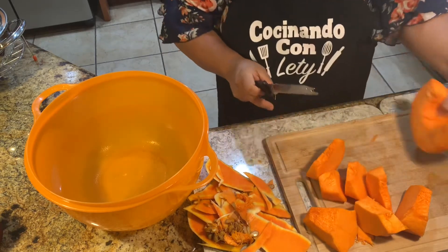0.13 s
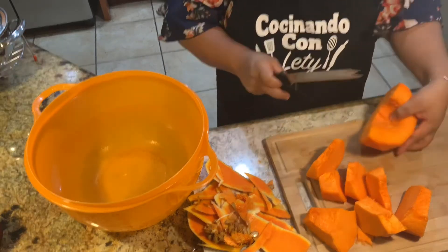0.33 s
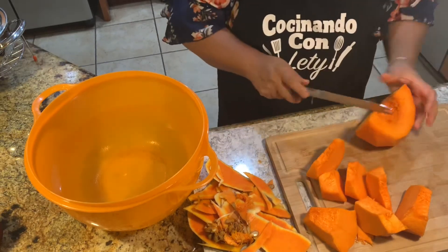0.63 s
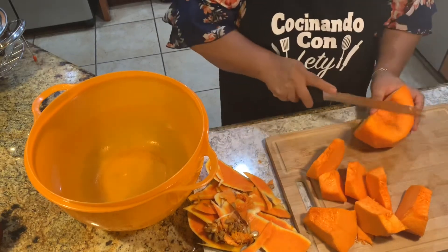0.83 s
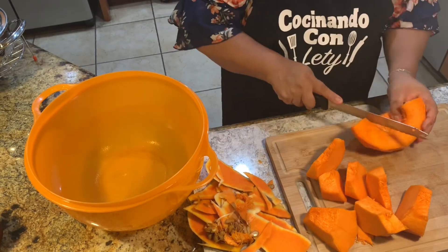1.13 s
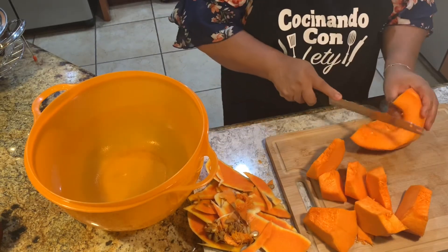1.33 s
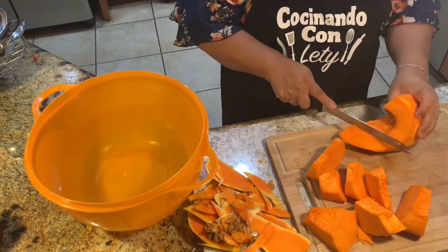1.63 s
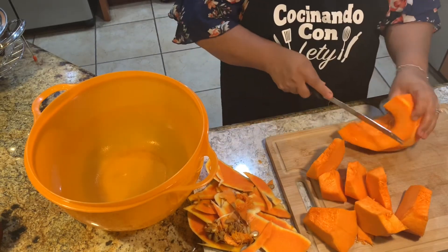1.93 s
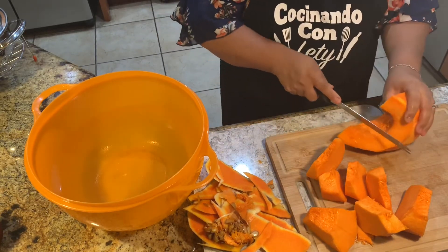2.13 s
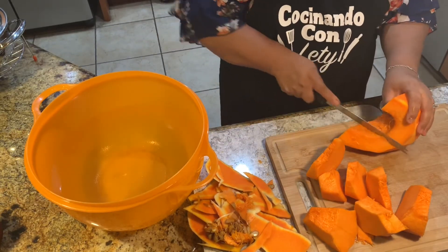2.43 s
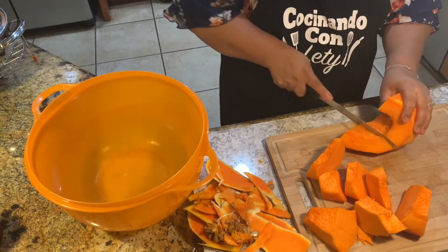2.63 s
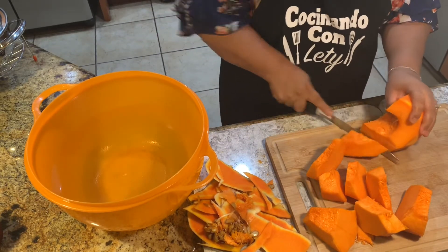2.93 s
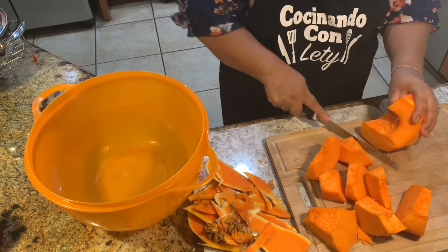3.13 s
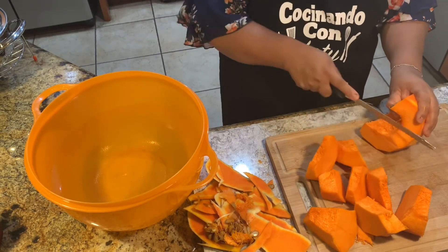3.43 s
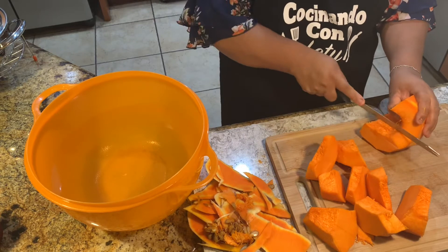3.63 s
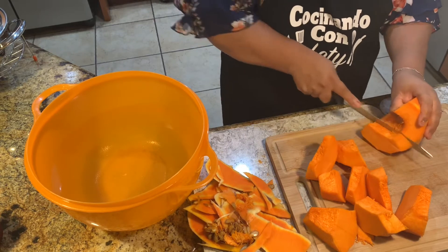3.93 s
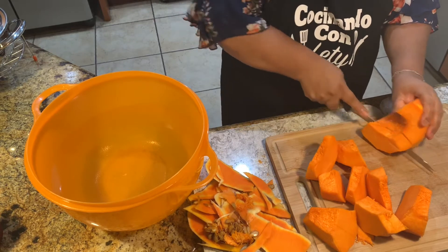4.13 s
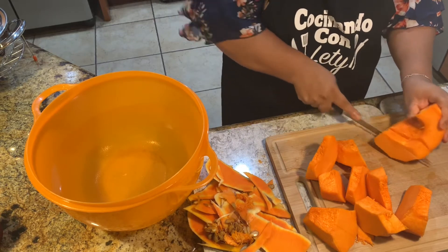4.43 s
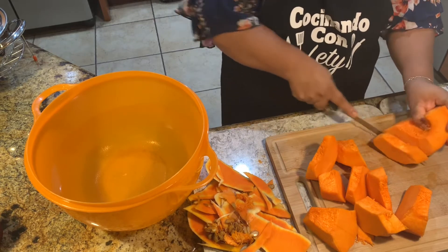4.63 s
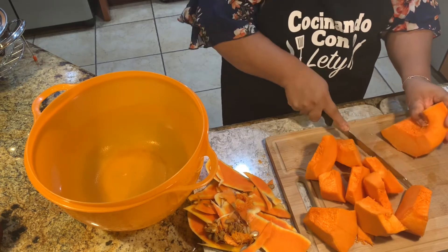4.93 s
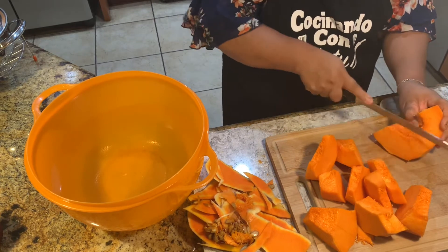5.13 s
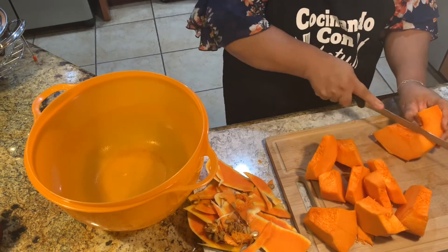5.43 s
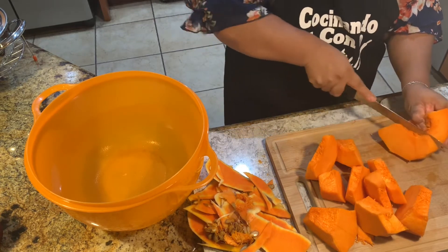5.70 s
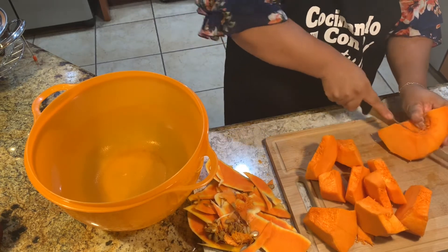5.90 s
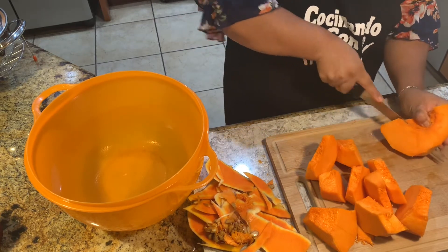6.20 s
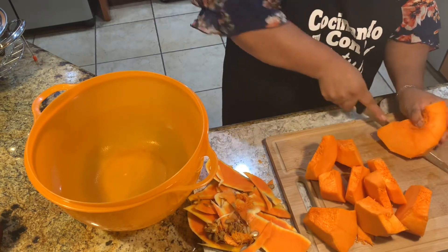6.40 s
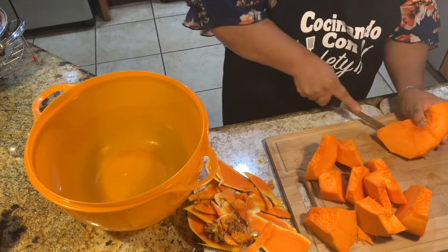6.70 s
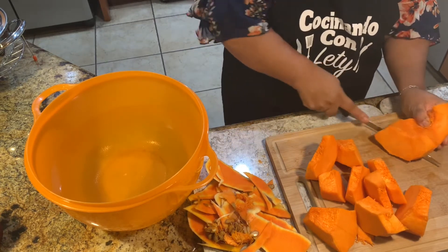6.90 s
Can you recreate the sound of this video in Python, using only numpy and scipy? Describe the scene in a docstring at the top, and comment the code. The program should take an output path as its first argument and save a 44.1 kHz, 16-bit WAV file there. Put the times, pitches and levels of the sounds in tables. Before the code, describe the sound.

Close up in a tiled kitchen, a chunk of raw pumpkin lands with a soft thud on a wooden board, then near quiet with faint bangle tinkles. From about two seconds a knife saws in short wet hisses, breaking through with hard clacks near 2.7 and 4.4 seconds and brief squeaks. Scrapes and lighter knocks continue to the end over a faint fridge hum and a short room echo.

```python
"""In a tiled kitchen, heard from close above, a knife saws through firm raw pumpkin on a wooden board.
Random tiny slips make the hiss of tearing wet fibres and shake blade, board and chunk into ringing.
Short pushes ring the same bodies as knocks, and the counter as thuds; a thin metal bangle tinkles in pure tones.
Bending stacks of tones squeak as a slice lets go. A wavering tone is the fridge hum, over rumble and room air."""
import sys
import numpy as np
from scipy import signal
from scipy.fft import rfft, irfft, next_fast_len
from scipy.io import wavfile
from scipy.ndimage import uniform_filter1d, map_coordinates

SR = 44100
rng = np.random.default_rng(int(sys.argv[2]) if len(sys.argv) > 2 else 0)


def put_to_file(sound):
    """Save the sound as 16-bit audio at rate SR, in the file named by the first command-line argument."""
    columns = np.atleast_2d(sound).T  # one column per channel
    safe = np.clip(columns, -1, 1)
    whole_steps = np.round(safe * 32767)
    wavfile.write(sys.argv[1], SR, whole_steps.astype(np.int16))


N = 311346
TIME = np.arange(N) / SR

# fridge hum and counter rumble over time: [t/s, hum peak level/dB, rumble level/dB]
HUM_LEVELS = [(0.0, -59, -69), (0.41, -58.5, -65), (1.3, -56.5, -61), (1.67, -63, -69), (2.4, -69, -65.5),
              (3.36, -66.5, -73.5), (3.74, -56.5, -64.5), (5.84, -57.5, -68.5), (7.06, -56, -56.5)]
# tone balance of the low rumble: [f/Hz, level/dB]
RUMBLE_COLOUR = [(24, -20), (31, -7.5), (40, -10.5), (50, 2), (60, 3), (80, 0.5), (110, -48.0)]
# tone balance of the room air: [f/Hz, level/dB]
AIR_COLOUR = [(76, -31.5), (130, -6), (162, -20.5), (297, -16), (735, -27), (780, -25.5), (863, -31),
              (1140, -34), (1400, -30), (1800, -40), (7000, -49.5), (16000, -52)]
# scrapes that start at once, as edge or chunk lands on the wood and drags:
# [start t/s, length t/s, swell/dB, fibre hiss level/dB, blade level/dB, board level/dB, chunk level/dB]
SCRAPES = [(0.0, 0.23, -13.5, -81, -87, -71, -77), (0.213, 0.11, -12, -64, -71, -56, -43),
           (0.675, 0.098, -12, -65.5, -88, -67, -67), (0.84, 0.1, -16, -70, -90, -76, -78),
           (1.03, 0.05, 3, -78.5, -85, -72, -70.5), (2.69, 0.16, -2.5, -47, -37, -37.5, -48.5),
           (3.09, 0.14, -18, -85.0, -79, -64, -70), (4.025, 0.09, 0.0, -45.5, -75.0, -57, -64.0),
           (4.241, 0.059, 1.5, -55.5, -49.5, -54, -78), (4.395, 0.17, -10, -71, -52, -38, -48.5),
           (4.659, 0.031, -5.5, -43, -39, -30.5, -51), (4.795, 0.068, -19, -59, -63.0, -47.5, -50),
           (4.99, 0.17, -23.0, -63.0, -69, -58.5, -66), (5.342, 0.093, 3, -50.5, -76, -57, -58),
           (6.318, 0.14, -1.5, -66, -68, -48, -52.5), (6.448, 0.11, 5.5, -45.5, -71, -57.5, -69),
           (6.682, 0.04, -8, -67.0, -48, -40, -46), (6.822, 0.035, 4.5, -54.5, -50.5, -48.5, -51.5),
           (6.926, 0.035, 1.5, -46.5, -64, -40.5, -48.5)]
# sawing strokes through the flesh, which rise more slowly:
# [start t/s, length t/s, swell/dB, fibre hiss level/dB, blade level/dB, board level/dB, chunk level/dB]
STROKES = [(1.11, 0.047, 15, -82, -99, -74, -80), (1.941, 0.168, 13, -76.5, -77.0, -89, -88),
           (2.257, 0.11, 8.5, -51.5, -88, -60.5, -61), (2.511, 0.15, 7.5, -44, -51.5, -61, -53.5),
           (2.94, 0.11, 4, -63, -54, -47.5, -45.5), (3.521, 0.097, 9.5, -55, -88, -59.5, -60.5),
           (3.762, 0.14, 5.5, -48.5, -51.5, -52, -55.5), (4.3, 0.044, 6.5, -39, -62, -50, -65),
           (4.484, 0.035, 5, -45.0, -73.5, -53, -48), (4.853, 0.061, 20.5, -80, -68.5, -79, -67),
           (5.19, 0.1, 6.0, -75.5, -71.5, -67.5, -72.5), (5.582, 0.24, 5.5, -51, -53, -52, -59.5),
           (5.96, 0.15, 0, -60.5, -68, -59.5, -74.5), (6.211, 0.071, 25, -53, -59, -60.5, -63.5),
           (6.625, 0.05, 7.5, -44, -60, -50, -66)]
# tone balance of the tearing fibres: [f/Hz, level/dB]
FIBRE_COLOUR = [(880, -29), (1500, -4), (2020, 1.5), (2190, 1), (4200, 1.5), (8570, -7.5), (16000, -11.5)]
# ringing tones (modes) of each body: [f/Hz, level/dB, time to fade by 60 dB t/s]
BLADE_MODES = [(2070, -13, 0.022), (2290, -9, 0.019), (2857, -5.5, 0.01), (3156, -2, 0.01),
               (3645, 4, 0.0026), (3810, -6, 0.0054), (4500, -7, 0.0086), (5530, -5.5, 0.008),
               (6460, -7.5, 0.0034), (8000, -12.5, 0.0025)]
BOARD_MODES = [(727, -23, 0.2), (944, 2, 0.037), (1058, -8, 0.014), (1089, -5.5, 0.056), (1140, 10, 0.0066),
               (1185, 2, 0.025), (1355, 2.5, 0.018), (1610, -0.5, 0.016)]
CHUNK_MODES = [(224, -4.5, 0.039), (271, -4, 0.079), (371, -8, 0.094), (466, 2, 0.061), (613.5, -6, 0.04)]
COUNTER_MODES = [(55.5, 0, .6), (66, -12, .3), (85, -8, .2), (113, -2, .2)]
# blows on the board; contacts shorter than 0.02 ms are played as 0.02 ms:
# [t/s, blade level/dB, board level/dB, chunk level/dB, counter level/dB, softness of contact t/ms]
KNOCKS = [(0.2152, -26, -18, -3.5, -3, 0.11), (0.273, -50, -32, -15.5, -6.5, 0.13),
          (0.6913, -40, -42, -40, -32, 0.13), (2.6945, 8, -1, -12, -34, 0.017),
          (2.866, -24, -25, -10, -28, 0.077), (3.0563, -19, -36, -20, -38, 0.088),
          (3.095, -21, -30, -36, -48, 0.24), (4.2417, -18.5, -15.5, -47, -40, 0.02),
          (4.345, -45, -43, -41, -13, 0.2), (4.3927, 3, 10.5, -0.5, -26, 0.03),
          (4.795, -25, -14, -17, -49, 0.16), (5.722, -16, -24, -50, -38, 0.078),
          (6.3177, -4.5, 1, -3.5, -21, 0.062), (6.6864, -11.5, -9, -18.5, -43, 0.053),
          (6.8228, -28, -23, -14, -33, 0.093), (6.843, -19, -31, -37, -36, 0.091),
          (6.931, -35, -20, -43, -43, 0.05)]
# bangle strikes: [t/s, time until skin damps it t/s, high ring level/dB, low ring level/dB,
# share of the high ring's twin -1..1, share of the low ring's twin -1..1]
TINKLES = [(0.691, 0.14, -48, -70, -0.1, -.9), (0.846, .05, -56, -74, 0.4, 0),
           (1.04, .12, -65, -69, -.7, -0.51), (1.271, 0.049, -60, -68.5, 0.5, 0.83),
           (4.273, 0.054, -52, -78, .4, 0), (4.986, .16, -45.5, -63.5, .4, -.9)]
# light ticks of metal: [t/s, level/dB]
TICKS = [(0.85, -41.5), (0.9443, -51), (1.017, -50), (1.575, -62), (3.541, -58), (4.242, -45.5),
         (4.9864, -56), (7.044, -51)]
# stick-slip squeaks: [start t/s, length t/s, start f/Hz, end f/Hz, level/dB]
SQUEAKS = [(1.199, 0.0067, 3700, 3150, -52.5), (1.204, 0.055, 3120, 3160, -72),
           (2.841, .035, 2600, 515, -36), (4.315, 0.0061, 4730, 3960, -37), (4.318, 0.022, 3855, 2730, -30),
           (4.324, 0.021, 2042, 813, -36), (4.327, 0.017, 5270, 3300, -30.5),
           (4.993, 0.022, 3170, 688, -37)]

HUM_HZ, AIR_DB = 119.3, -62.5
STROKE_ATTACK_S, STROKE_RELEASE_S = 0.051, 0.087
SCRAPE_ATTACK_S, SCRAPE_RELEASE_S = .007, 0.068
LINGER_DB, LINGER_S = -25, .12  # faint drag that outlasts each release
PATCH_HZ, PATCH_S, PATCH_DB = 353, .05, 3  # size and depth of the hiss's passing resonances
BLOCK = 32  # samples between steps of the stroke and scrape levels
BANGLE_HZ, TWIN_HZ, BANGLE_T60_S = (14790, 9855), (11, 7), .5  # TWIN_HZ: how far each twin lies above
ROOM_T60_S, ROOM_DB = 0.22, -18.5
BASS_CUT_HZ, TOP_HZ = 40, 15800


def undb(db):
    """Turn decibels into a gain."""
    return 10 ** (np.asarray(db, float) / 20)


def unit(x):
    """Scale to an average strength (rms) of 1."""
    return x / np.sqrt(np.mean(x ** 2))


def fade_60(t, t60):
    """Steady die-away that loses 60 dB in t60 seconds."""
    return np.exp(-np.log(1000) * t / t60)


def columns(table):
    """Draw each level column as a curve over time, one value a sample."""
    times, *levels = np.transpose(table)
    return [np.interp(TIME, times, level, left=-120) for level in levels]


def colour(x, points):
    """Give a steady noise its tone balance from (f/Hz, level/dB) points, at rms 1."""
    hz, db = np.transpose(points)
    size = next_fast_len(N)
    bins = np.arange(size // 2 + 1) * SR / size + 1  # 1 Hz up, so the logarithm never meets zero
    gain = undb(np.interp(np.log(bins), np.log(hz), db))
    return unit(irfft(rfft(x, size) * gain, size)[:N])


def ring(modes):
    """A sharply tapped body sounds several fading tones at once; total energy is 1."""
    t = TIME[:SR // 2]
    y = np.zeros(len(t))
    for k, (hz, db, t60) in enumerate(modes):
        sense = (-1) ** k  # neighbouring modes start in opposite senses
        y += sense * undb(db) * fade_60(t, t60) * np.sin(2 * np.pi * hz * t)
    return y / np.sqrt(np.sum(y ** 2))


def through(x, response):
    """Let every moment of x set off the response."""
    return signal.fftconvolve(x, response)[:N]


def grains(per_s, spread_db):
    """Random tiny slips, a few far bigger than the rest."""
    on = rng.random(N) < per_s / SR
    return on * rng.standard_normal(N) * undb(spread_db * rng.exponential(size=N))


def walk(rate):
    """A random level that glides to a new value about `rate` times a second."""
    k = int(SR / rate)
    steps = np.repeat(rng.standard_normal(N // k + 1), k)
    return uniform_filter1d(steps, k)[:N]


def taps(times, dbs):
    """A one-sample tap at each time."""
    x = np.zeros(N)
    x[(np.asarray(times) * SR).astype(int)] = undb(dbs)
    return x


def kitchen():
    """Room air as soft noise, a fridge hum wavering in pitch and level, and low rumble through the counter."""
    hum_db, rumble_db = columns(HUM_LEVELS)
    hum_level = undb(hum_db + 0.89 * walk(15))
    hum_hz = HUM_HZ + 0.83 * walk(19)
    hum = hum_level * np.sin(2 * np.pi * np.cumsum(hum_hz) / SR)
    rumble = colour(rng.standard_normal(N), RUMBLE_COLOUR) * undb(rumble_db + 5.5 * walk(3.1))
    air = colour(rng.standard_normal(N), AIR_COLOUR) * undb(AIR_DB + 0.68 * walk(1))
    return hum + rumble + air


def gestures(table, attack_s, release_s):
    """Power fed to hiss, blade, board and chunk: each row rises, swells or sinks along its length, then lets go."""
    start, length, swell_db, *dbs = np.transpose(table)[:, :, None]
    t = np.arange(N // BLOCK + 2) * BLOCK / SR - start
    rise = np.clip(t / attack_s, 0, 1) ** 2
    swell = undb(swell_db * (np.clip(t / length, 0, 1) - .5))
    after = np.clip(t - length, 0, None)
    release = np.exp(-(after / release_s) ** 2)
    linger = undb(LINGER_DB) * np.exp(-after / LINGER_S)
    shape = rise * swell * np.maximum(release, linger)
    return undb(np.hstack(dbs)).T ** 2 @ shape ** 2  # powers of overlapping rows add


def patchy(x):
    """Narrow bands swell and sink on their own, as wet flesh grips the edge unevenly."""
    spectra = signal.stft(x, nperseg=256)[2]
    bands = max(PATCH_HZ * 256 / SR, 1)
    steps = PATCH_S * SR / 128
    grid = rng.standard_normal((200, 400))
    rows = np.arange(spectra.shape[0]) / bands
    times = np.arange(spectra.shape[1]) / steps
    at = np.meshgrid(rows, times, indexing="ij")
    patches = map_coordinates(grid, at, mode="wrap")  # smooth map over pitch and time
    return unit(signal.istft(spectra * undb(PATCH_DB * patches), nperseg=256)[1][:N])


def sawing():
    """Fibres tear under the edge; uneven slips shake the blade, the board and the chunk lying on it."""
    power = gestures(STROKES, STROKE_ATTACK_S, STROKE_RELEASE_S)
    power = power + gestures(SCRAPES, SCRAPE_ATTACK_S, SCRAPE_RELEASE_S)
    block_at = np.arange(N) / BLOCK
    hiss, *rubs = [np.interp(block_at, np.arange(len(p)), np.sqrt(p)) for p in power]
    fibres = patchy(colour(grains(15000, 1.2), FIBRE_COLOUR))
    out = fibres * hiss * undb(2.0 * walk(40))
    judder = walk(70)  # shared by all three bodies
    for modes, rub in zip((BLADE_MODES, BOARD_MODES, CHUNK_MODES), rubs):
        slips = grains(3500, 1.1) * undb(2.0 * judder)
        body = np.zeros(N)
        for hz, mode_db, t60 in modes:
            # the point of contact travels, so each mode is fed more or less from moment to moment
            feed = undb(mode_db + 10 * np.log10(t60) + 5.5 * walk(13))
            body += through(slips * feed, ring([(hz, 0, t60)]))
        out += unit(body) * rub
    return out


def knocks():
    """Each blow is a quick push and two small rebounds that ring blade, board, chunk and counter."""
    bodies = [ring(modes) for modes in (BLADE_MODES, BOARD_MODES, CHUNK_MODES, COUNTER_MODES)]
    force = np.zeros((4, N))
    for (start, *dbs, soft_ms), luck in zip(KNOCKS, rng.random((len(KNOCKS), 2))):
        contact = np.zeros(400)
        delays_ms = (0, .9 + .3 * luck[0], 2.4 + .8 * luck[1])
        for late_ms, size in zip(delays_ms, (1, .3, .15)):
            u = np.clip(TIME[:400] * 1000 - late_ms, 0, None) / max(soft_ms, .02)
            contact += size * u * np.exp(-u)  # a softer push is longer, so duller
        first = int(start * SR)
        for row, db, body in zip(force, dbs, bodies):
            energy = np.sum(np.convolve(contact, body[:2000]) ** 2)
            row[first:first + 400] += undb(db) * contact / np.sqrt(energy)
    return sum(through(row, body) for row, body in zip(force, bodies))


def bangle():
    """Bare metal ticks, and two rings whose close twin tones beat until the wrist damps them."""
    tick_times, tick_db = np.transpose(TICKS)
    burst = np.diff(rng.standard_normal(200)) * np.exp(-TIME[:199] / 0.00084)  # bright, very short noise
    out = through(taps(tick_times, tick_db), burst)
    for start, length, high_db, low_db, *shares in TINKLES:
        t = np.clip(TIME - start, 0, None)
        damping = np.exp(-np.clip(t - length, 0, None) / .012)
        fade = fade_60(t, BANGLE_T60_S) * damping
        for hz, twin_hz, db, share in zip(BANGLE_HZ, TWIN_HZ, (high_db, low_db), shares):
            tone = np.sin(2 * np.pi * hz * t)
            twin = share * np.sin(2 * np.pi * (hz + twin_hz) * t)
            out += undb(db) * fade * (tone + twin)
    return out


def squeaks():
    """Wet skin sticks and slips at a changing, mostly falling rate: a rough stack of harmonics."""
    out = np.zeros(N)
    for start, length, from_hz, to_hz, db in SQUEAKS:
        u = np.linspace(0, 1, int(length * SR))
        wobble, flutter = uniform_filter1d(rng.standard_normal((2, len(u))), size=40)
        glide_hz = from_hz + (to_hz - from_hz) * u ** 0.87
        hz = glide_hz * (1 + 0.4 * wobble)
        turn = 2 * np.pi * np.cumsum(hz) / SR
        stack = np.zeros(len(u))
        for k in range(3):
            below_top = (k + 1) * hz < 9500  # higher harmonics stay silent
            stack += undb(-6.0 * k) * np.sin((k + 1) * turn) * below_top
        edges = np.sin(np.pi * u) ** 0.097  # quick start and stop
        first = int(start * SR)
        out[first:first + len(u)] += undb(db + 13.0 * flutter) * stack * edges
    return out


def scene():
    """All sources, with a short dull echo from tiles and cupboards on the near ones."""
    near = sawing() + knocks() + bangle() + squeaks()
    t = TIME[:SR // 2]
    dull_noise = uniform_filter1d(rng.standard_normal(len(t)), 5)
    echo = dull_noise * fade_60(t, ROOM_T60_S) * (t > .004)  # the first echoes come after 4 ms
    wet = through(near, echo / np.sqrt(np.sum(echo ** 2)))
    return (near + undb(ROOM_DB) * wet + kitchen())[None]


def record(dry):
    """The microphone drops the deepest bass and the recorder cuts the top."""
    bass_cut = signal.butter(2, BASS_CUT_HZ, "high", fs=SR, output="sos")
    top_cut = signal.ellip(10, .2, 70, TOP_HZ, fs=SR, output="sos")
    return signal.sosfilt(top_cut, signal.sosfilt(bass_cut, dry))


dry = scene()
out = record(dry)
put_to_file(out)
```